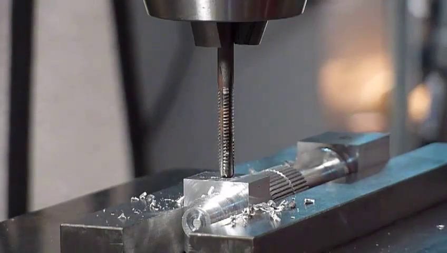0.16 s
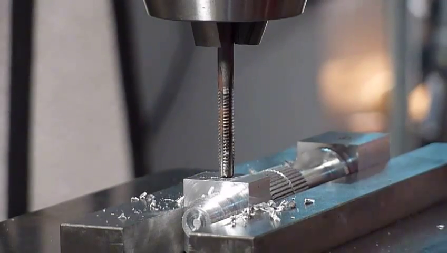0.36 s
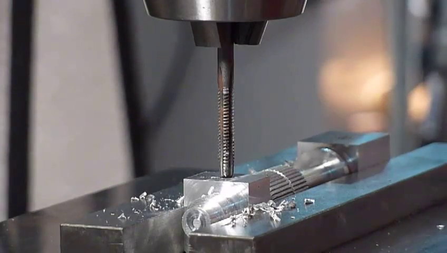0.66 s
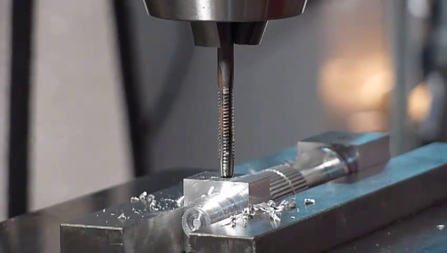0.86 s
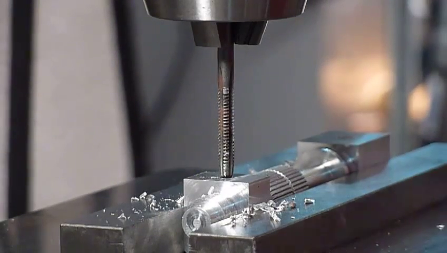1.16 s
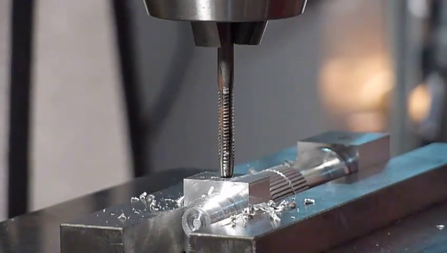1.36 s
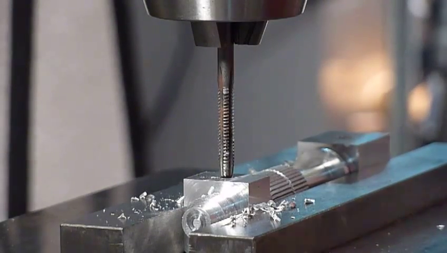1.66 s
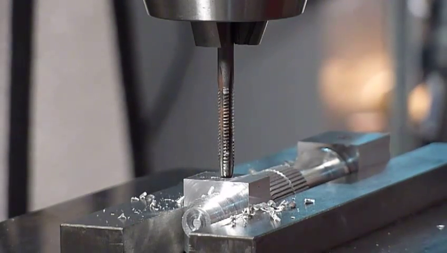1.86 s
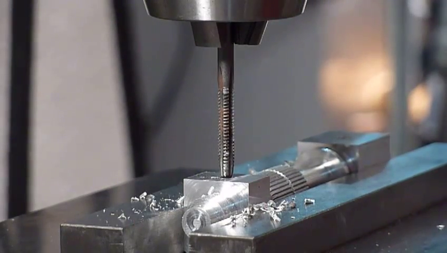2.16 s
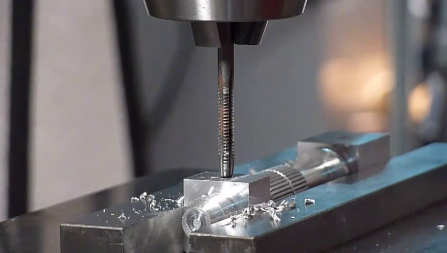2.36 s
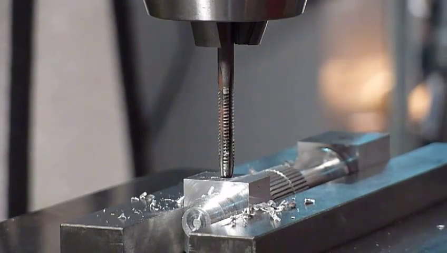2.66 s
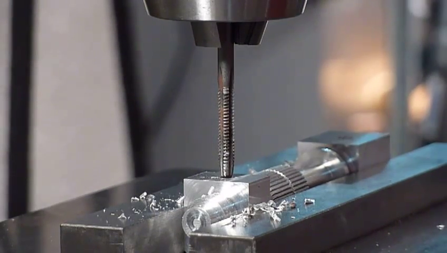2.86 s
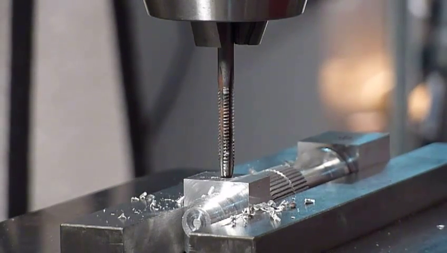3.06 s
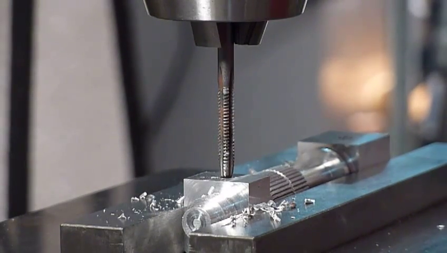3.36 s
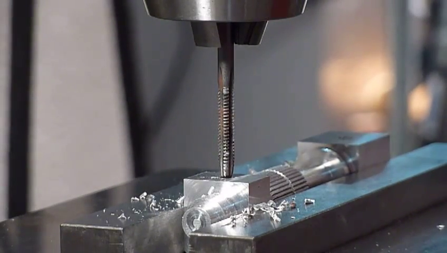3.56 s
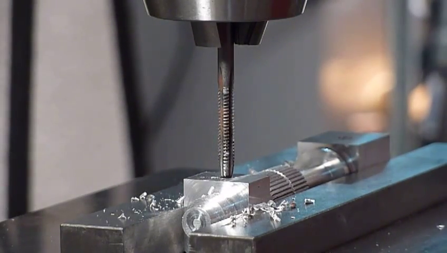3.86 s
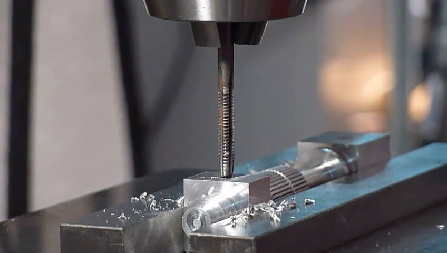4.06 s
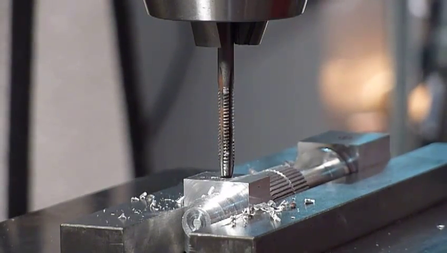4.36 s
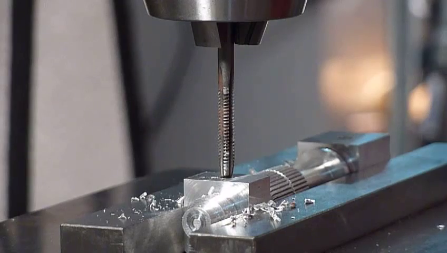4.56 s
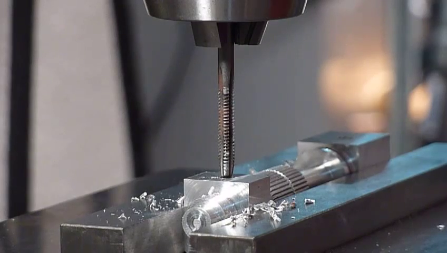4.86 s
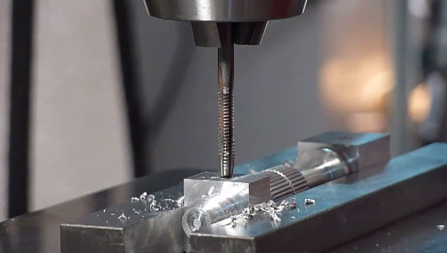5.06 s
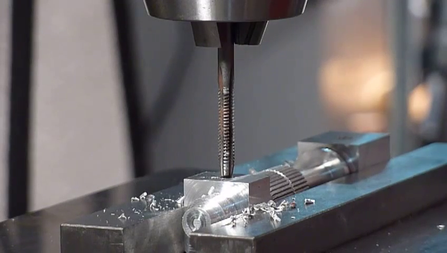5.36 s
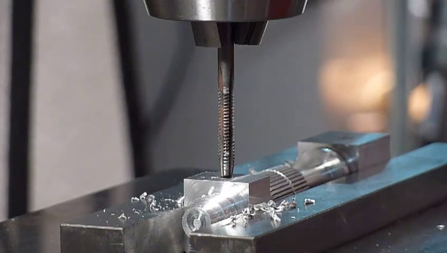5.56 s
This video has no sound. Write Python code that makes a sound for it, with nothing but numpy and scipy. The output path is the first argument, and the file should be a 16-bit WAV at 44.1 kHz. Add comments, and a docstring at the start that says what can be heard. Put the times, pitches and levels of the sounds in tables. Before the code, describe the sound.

A drill press spindle dies away in soft hiss with a thin rising squeak and a small lever knock. A dull double knock on the bench follows, then a very loud, bright steel clink with a fast bounce. After a pause, quiet tool clicks and scrapes cluster late. Small workshop, short reverberation, low hum, close stereo microphones with narrow, dull treble.

```python
"""A small workshop: a drill press coasts to a stop with hiss and a faint squeak, its lever knocks, there is a
dull double knock on the bench, and a steel part is struck with a sharp clink. Later a latch or hand tool clicks
and scrapes. Contacts are short bursts of noise that set resonances ringing; the spindle is shaped noise and the
squeak a gliding tone. The room answers with a short reverberation, over quiet room noise with a low hum. A pair
of small microphones hears it all; the treble is uneven, with a notch, a gap and a weak top band."""
import sys
import numpy as np
from scipy import signal
from scipy.fft import rfft, irfft, next_fast_len
from scipy.io import wavfile
from scipy.ndimage import uniform_filter1d

SR = 44100
rng = np.random.default_rng(int(sys.argv[2]) if len(sys.argv) > 2 else 0)


def unload_wav(signal):
    """Save mono or channel-first audio to the path in sys.argv[1] as 16-bit WAV at rate SR, clipped to [-1, 1]."""
    wavfile.write(
        sys.argv[1],
        SR,
        np.round(np.clip(np.atleast_2d(signal).T, -1, 1) * 32767).astype(np.int16),
    )


def elevation(decibels):
    """Turn decibel levels (scalar or array-like) into linear amplitude ratios."""
    levels = np.asarray(decibels, float)
    return 10 ** (levels / 20)


N = 252252  # length in samples

# In all contact tables, level is relative, weight lifts the thud and body, edge lifts the treble.
# a blow on the steel part and its bounces: (time [s], level [dB], weight [dB], edge [dB])
STEEL_BLOWS = [(0.8006, 6.5, -9.5, -11), (0.8184, 5, -13.5, -18), (0.8303, -11.5, -5, -30.5),
               (0.8571, -19.5, -30.5, -11)]
# what the steel part rings with: (frequency [Hz], width [Hz], level [dB])
STEEL_MODES = [(412, 30, -6), (537, 40, -4), (1012, 30, -13), (1334, 30, -6), (1800, 45, -12),
               (2005, 35, -14), (2400, 40, -10), (2825, 40, -7), (2915, 24, -5), (2986, 18, -1),
               (3040, 9, 4), (3073, 7, 5), (3101, 14, 0), (5960, 110, 1), (6140, 90, -4)]
# sharp clicks of the tool; the struck spot favours a pitch region:
# (time [s], level [dB], weight [dB], edge [dB], favoured pitch [Hz])
TOOL_CLICKS = [(1.7688, -30, -13, -8, 4060), (3.1787, -47.5, -14, -6, 3330),
               (3.484, -30.5, -16.5, -0.5, 3970), (3.7459, -38.5, -1.5, -11, 2980),
               (3.7701, -23.5, -14, -5.5, 3800), (3.893, -37.5, -7, -5, 6800),
               (4.0376, -26.5, -8, 6.5, 6900), (4.1493, -23, -9.5, -0.5, 6850),
               (4.1919, -23.5, -5.5, 2.5, 5000), (4.2914, -26, -3.5, 4.5, 4450),
               (4.5298, -25, -8, 1.9, 2620), (5.018, -48.5, -7.5, -9, 1980),
               (5.1581, -17.5, -6, -2.5, 2760), (5.2201, -38.5, 6.5, -22, 560), (5.4834, -32, 1, -1, 4950)]
# the tool slides or is set down, with a softer start:
# (time [s], level [dB], weight [dB], edge [dB], contact time [s])
TOOL_SCRAPES = [(1.5706, -46, 10, -19, 0.012), (1.6084, -46.5, -3, -10, 0.032),
                (3.7476, -37.5, 3, -10, 0.042), (3.7832, -28, 8.5, -8, 0.011),
                (3.9302, -33.5, 0, -3, 0.0077), (4.7343, -33.5, 3.7, -9.5, 0.008),
                (5.2987, -40, 3.5, -8, 0.026), (5.3933, -36, -3.5, -10.5, 0.026),
                (5.4284, -30.5, -5, -7.5, 0.018), (5.4433, -37, 15.5, -35, 0.021)]
# what the tool rings with: (frequency [Hz], width [Hz], level [dB])
TOOL_MODES = [(560, 110, 0), (970, 45, 0), (1670, 50, -5), (2240, 45, -3), (2620, 60, 0), (2900, 120, -5),
              (3270, 160, -5), (3920, 70, -4), (4435, 90, 4), (4810, 120, -2), (5840, 150, 0),
              (6850, 140, 4)]
# the feed lever knocks against its stop and bounces: (time [s], level [dB], weight [dB], edge [dB])
LEVER_KNOCKS = [(0.1226, -35.5, -0.5, -15), (0.1484, -48, -11, -1)]
# what the lever rings with: (frequency [Hz], width [Hz], level [dB])
LEVER_MODES = [(442, 89, 0), (814, 62, 0), (1306, 55, 3.5), (1750, 90, -23)]
# a dull double knock on the bench: (time [s], level [dB], weight [dB], edge [dB])
BENCH_KNOCKS = [(0.4698, -39, 10.5, -11.5), (0.4874, -37.5, -4, -17)]
# what the bench rings with: (frequency [Hz], width [Hz], level [dB])
BENCH_MODES = [(330, 120, -3), (625.6, 100, -3), (1000, 260, -5), (3624, 406, -3.5)]
# where low thud, thud, body, middle, treble and top of a contact lie: (frequency [Hz])
COLOUR_HZ = [260, 550, 1300, 2900, 5600, 9000]
# resonances of the drill head around the spindle: (frequency [Hz], width [Hz], level [dB])
SPINDLE_MODES = [(1730, 110, -3.5), (3666, 400, -1), (4350, 710, 2), (6450, 360, -3)]
# how fast the reverberation dies: (frequency [Hz], time to fall by 60 dB [s])
ROOM_DECAY = [(200, 0.37), (500, 0.22), (1000, 0.36), (3000, 0.3), (6000, 0.3), (9000, 0.22)]
# how alike the reverberation is left and right: (frequency [Hz], likeness [-1 to 1])
ROOM_LIKENESS = [(60, .9), (300, .99), (800, .93), (1850, .75), (4400, .5), (10300, .2)]
# relative spectrum of the room noise: (frequency [Hz], level [dB])
AIR_SPECTRUM = [(24, -88), (40, -47.5), (151, -20.5), (183, -13.5), (218, -8), (351, -4.5), (456, -3.5),
                (802, -2), (1110, -5), (4000, -13.5), (7200, -19.5), (9360, -57), (15800, -120)]
# the hiss of the room noise swells and sinks: (time [s], treble lift [dB])
AIR_DRIFT = [(0, 2), (1.2, -3), (1.7, 0), (2.2, -0.6), (2.7, -2.5), (3.2, -3), (4.0, -0.1), (4.9, -3)]
# how alike the room noise is left and right: (frequency [Hz], likeness [-1 to 1])
AIR_LIKENESS = [(60, 0.12), (170, 0.81), (470, 0.82), (1320, 0.23), (3680, -0.2), (10300, -0.26)]
# hum of distant machines: (frequency [Hz], width [Hz], level [dB])
HUM = [(185.5, 15, -76), (350.9, 7.4, -75)]
# uneven treble: a notch near 5.4 kHz, a gap near 8 kHz and a weak band above: (frequency [Hz], level [dB])
PASS_BAND = [(5000, 0), (5300, 0), (5430, -27.5), (5560, -3), (5800, 2.5), (7250, -0.5), (7450, -32.5),
             (8550, -75.5), (8700, -11.5), (9300, -10.5), (9900, -32.5), (10300, -50)]


def evened(x):
    """Scales to an rms of 1."""
    return x / np.sqrt(np.mean(x ** 2) + 1e-20)


def read(points, hz):
    """Reads a spectrum table on a log-frequency axis."""
    f, value = np.transpose(points)
    return np.interp(np.log(hz + 1), np.log(f + 1), value)


def ringing(modes, hz):
    """Complex response of a set of resonances: each peaks at its frequency, and a narrow one rings longer."""
    return sum(elevation(db) / (1 + 2j * (hz - f) / abs(width)) for f, width, db in modes)


def flattened(x, size):
    """Spectrum of x with its coarse bumps taken out, so that no wide band is favoured."""
    z = rfft(x)
    return z * np.linalg.norm(x) / np.sqrt(uniform_filter1d(abs(z) ** 2, size=size) + 1e-20)


def pair(shape, likeness):
    """Left and right random spectra, the right one sharing part of the left."""
    a, b, c, d = np.moveaxis(rng.standard_normal(shape + (4,)), -1, 0)
    likeness = np.clip(likeness, -1, 1)
    left, other = a + 1j * b, c + 1j * d
    return np.array([left, likeness * left + np.sqrt(1 - likeness ** 2) * other])


def contact_sound(modes, contact_s, favour_hz, colour_db, broad_db, snap, rise, size):
    """A rough burst of force with a short rattle is heard as a crack; burst and snap set the modes ringing."""
    spot_db = 2.5  # how unevenly the modes answer from blow to blow
    t, hz = np.arange(size) / SR, np.fft.rfftfreq(size, 1 / SR)
    body = ringing([(f, width, db + spot_db * rng.standard_normal()) for f, width, db in modes], hz)
    onset = np.minimum(t / (rise * contact_s), 1)
    rattle = 0.18 * np.exp(-t / (3 * contact_s))
    force = rng.standard_normal(size) * onset * (np.exp(-(t / contact_s) ** 2) + rattle)
    crack = flattened(force, size=130)
    push = (crack + snap * np.linalg.norm(force)) / np.hypot(1, snap)  # a snap has a flat spectrum
    shape_db = read(list(zip(COLOUR_HZ, colour_db)), hz)
    if favour_hz:
        octaves = np.log2((hz + 1) / favour_hz)
        shape_db = shape_db + 3.5 * np.exp(-(octaves / 0.2) ** 2)  # a bump of 3.5 dB
    return irfft((elevation(broad_db) * crack + push * body) * elevation(shape_db), size)


def blows(rows, modes, broad_db, body_db, top_db, snap, rise, contact_s=None):
    """Sets out one contact sound a row; each differs in its roughness and in how the modes answer."""
    size, lead = 16384, 400  # samples; the lead leaves room for what comes ahead of the contact
    out = np.zeros(N + size)
    fade = np.minimum(np.arange(size)[::-1] / SR / .05, 1)
    for s, db, weight, edge, *own in rows:
        # a fifth column is the contact time if none is set for all rows, or else the favoured pitch
        favour_hz = own[0] if own and contact_s else None
        colour_db = np.array([weight - 4, weight + 4, weight + body_db, 0, edge - 2, edge + top_db]) + db
        sound = contact_sound(modes, contact_s or own[0], favour_hz, colour_db, broad_db, snap, rise, size)
        at = round(s * SR) - lead
        out[at:at + size] += np.roll(sound, lead) * fade
    return out[:N]


def steel_part():
    """A hard blow starts at once and sets narrow, long-ringing modes of the steel going: a clink."""
    return blows(STEEL_BLOWS, STEEL_MODES, broad_db=-13.5, body_db=4.5, top_db=-12.5, snap=0.53,
                 rise=0.057, contact_s=0.0059)


def tool_clicks():
    """Short contacts of a latch or hand tool, with a strong crack over broader modes."""
    return blows(TOOL_CLICKS, TOOL_MODES, broad_db=-4.5, body_db=1.5, top_db=-1.0, snap=0.38,
                 rise=0.46, contact_s=0.005)


def tool_scrapes():
    """The same tool slides or is set down: softer, mostly longer contacts with less snap."""
    return blows(TOOL_SCRAPES, TOOL_MODES, broad_db=-6, body_db=-4.5, top_db=-4.5, snap=0.19, rise=1.32)


def feed_lever():
    """The lever meets its stop and bounces, ringing mostly in its low modes."""
    return blows(LEVER_KNOCKS, LEVER_MODES, broad_db=-10.0, body_db=20.5, top_db=5.0, snap=0.73,
                 rise=0.082, contact_s=0.005)


def bench():
    """Two knocks on broad, quickly dying modes of the bench: a dull sound."""
    return blows(BENCH_KNOCKS, BENCH_MODES, broad_db=-14.5, body_db=1.0, top_db=-8.0, snap=0.41,
                 rise=0.15, contact_s=.0066)


def spindle():
    """Bearing and belt hiss through the casing of the drill head swells, then sinks until the spindle stops."""
    top_s, end_s, top_db = 0.15, .45, -56.5
    rise_db_per_s, fall_db_per_s = 49, 54
    t, hz = np.arange(N) / SR, np.fft.rfftfreq(N, 1 / SR)
    hiss = rfft(rng.standard_normal(N)) * (elevation(-14.5) + ringing(SPINDLE_MODES, hz))
    level_db = top_db - np.maximum(rise_db_per_s * (top_s - t), fall_db_per_s * (t - top_s))
    return evened(irfft(hiss, N)) * elevation(level_db) * np.clip((end_s - t) / 0.049, 0, 1)


def squeak():
    """A thin, unsteady tone that glides up as the spindle stops."""
    start_s, length_s, level_db = .15, .25, -61
    from_hz, to_hz, glide_s, glide_length_s = 1330, 1665, .232, .035
    t = np.arange(N) / SR
    up = .5 + .5 * np.tanh((t - glide_s) / glide_length_s)  # 0 to 1
    flutter = 1 + 0.33 * evened(uniform_filter1d(rng.standard_normal(N), 400))
    tone = np.sin(2 * np.pi * np.cumsum(from_hz + (to_hz - from_hz) * up) / SR)
    swell = np.sin(np.pi * np.clip((t - start_s) / length_s, 0, 1))
    return tone * flutter * elevation(level_db) * swell


def workshop(x):
    """Dense reverberation: sound is smeared by decaying noise, each band dying at its own speed."""
    frames, hz = 345, np.fft.rfftfreq(256, 1 / SR)
    t = np.arange(frames)[:, None] * 64 / SR
    z = pair((frames, 129), read(ROOM_LIKENESS, hz)) * elevation(-60 * t / read(ROOM_DECAY, hz))
    tail = signal.istft(z.swapaxes(1, 2), nperseg=256, noverlap=192)[1]
    length = tail.shape[1]
    tail *= np.clip((np.arange(length) / SR - .002) / 0.0054, 0, 1)  # first walls answer after a few ms
    fade = np.minimum(np.linspace(5, 0, length), 1) ** 2
    tail = irfft(flattened(tail, size=40), length) * fade
    return signal.fftconvolve(x[None], tail / np.linalg.norm(tail[0]), axes=1)[:, :N]


def air():
    """Room noise whose spectrum drifts in patches of time and pitch, with fuzzy hum lines of narrow noise."""
    frames, hz = N // 256 + 5, np.fft.rfftfreq(1024, 1 / SR)
    z = pair((frames, 513), read(AIR_LIKENESS, hz))
    grain = rng.standard_normal((frames, 513))
    patches = evened(uniform_filter1d(uniform_filter1d(grain, 10, 0), 10, 1))
    drift_db = np.interp(np.arange(frames) * 256 / SR, *np.transpose(AIR_DRIFT))
    swell = drift_db[:, None] * hz / (hz + 1000)  # acts mostly on the treble
    level_db = read(AIR_SPECTRUM, np.minimum(hz, 7000))  # level from 7 kHz up
    z *= elevation(level_db + 1.6 * patches + swell)
    wash = signal.istft(z.swapaxes(1, 2), nperseg=1024, noverlap=768)[1][:, :N]
    wash = elevation(-58) * evened(wash)
    fine_hz = np.fft.rfftfreq(N, 1 / SR)
    for f, width, db in HUM:
        line = rfft(rng.standard_normal(N)) / (1 + (2 * (fine_hz - f) / width) ** 2)
        wash += elevation(db) * evened(irfft(line, N))
    return wash


def scene():
    """Small parts radiate no deep bass; near sources reach the left side a sample earlier; the room answers."""
    near = steel_part() + tool_clicks() + tool_scrapes() + feed_lever() + bench() + spindle() + squeak()
    near = signal.sosfilt(signal.butter(4, 210, "high", fs=SR, output="sos"), near)
    direct = np.array([near, np.roll(near, 1)])
    balance = elevation([[.45], [-.45]])  # the left is slightly louder
    return (direct + elevation(-0.5) * workshop(near) + air()) * balance


def top_cut(x):
    """Nothing passes above the cut-off."""
    return signal.sosfilt(signal.butter(12, 10900, fs=SR, output="sos"), x)


def record(dry):
    """Some treble bands pass and others are weakened, then a faint electronic hiss is added."""
    size = next_fast_len(N)
    response = elevation(read(PASS_BAND, np.fft.rfftfreq(size, 1 / SR)))
    shaped = irfft(rfft(dry, size) * response, size)[:, :N]
    mix = shaped + elevation(-101) * rng.standard_normal((N, 2)).T
    return top_cut(mix)


dry = scene()
out = record(dry)
unload_wav(out)
```